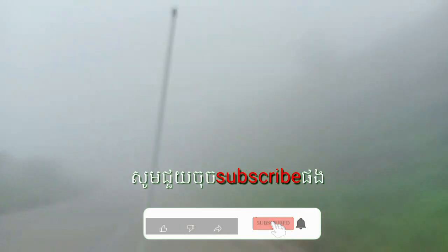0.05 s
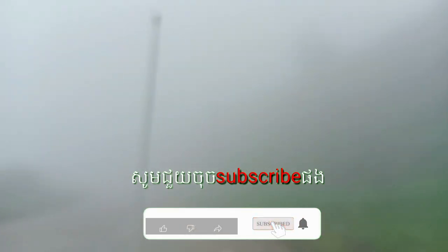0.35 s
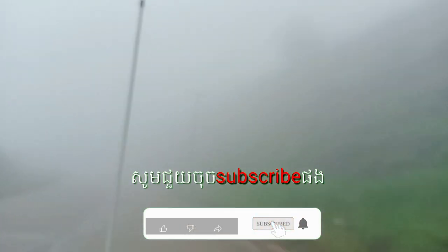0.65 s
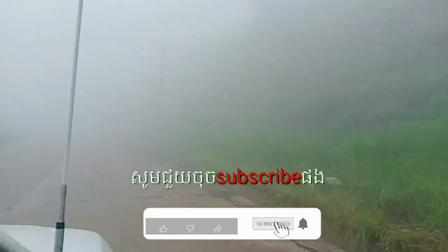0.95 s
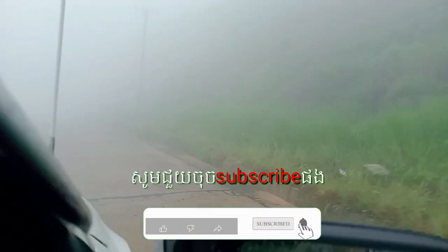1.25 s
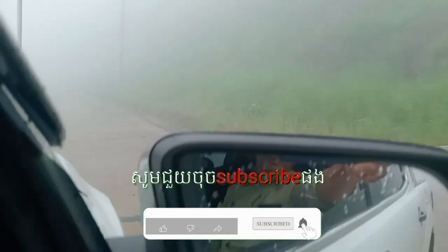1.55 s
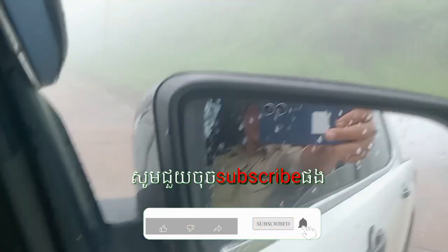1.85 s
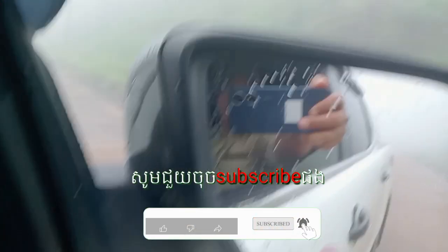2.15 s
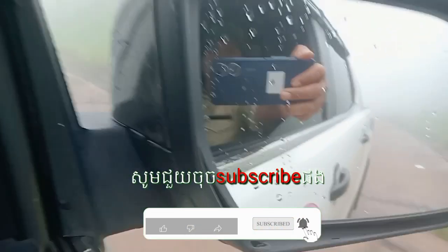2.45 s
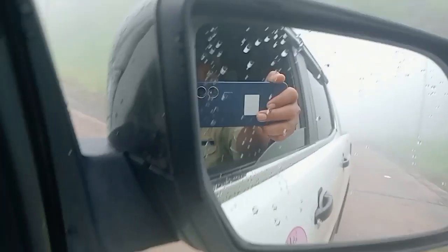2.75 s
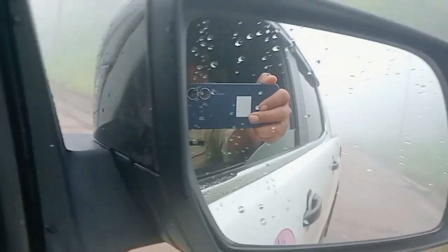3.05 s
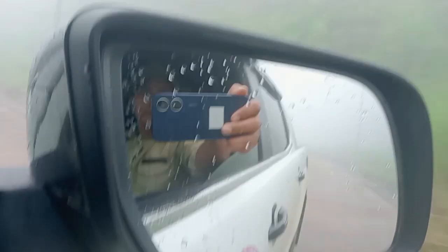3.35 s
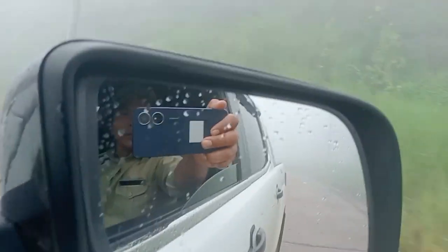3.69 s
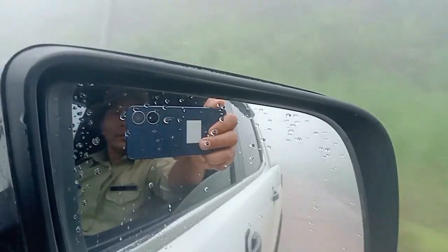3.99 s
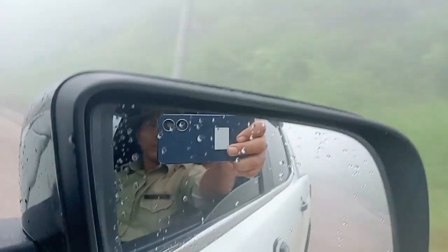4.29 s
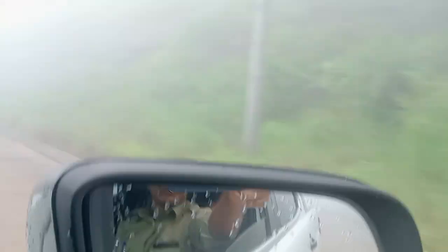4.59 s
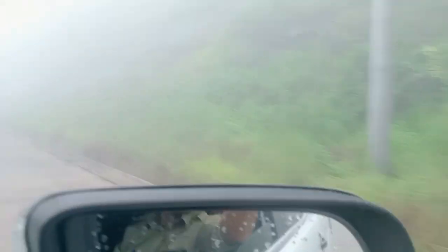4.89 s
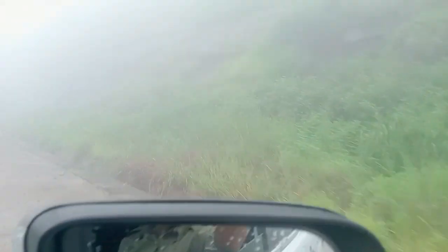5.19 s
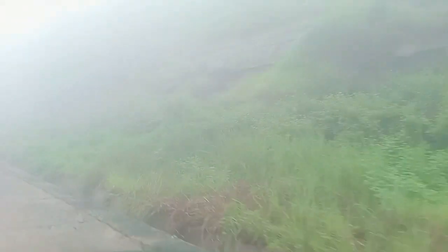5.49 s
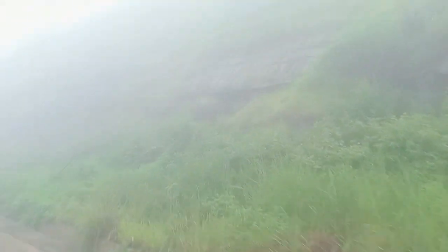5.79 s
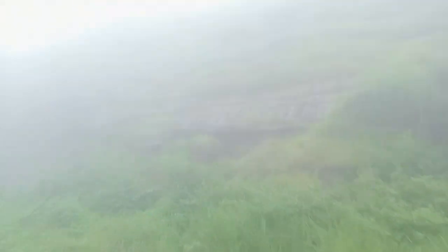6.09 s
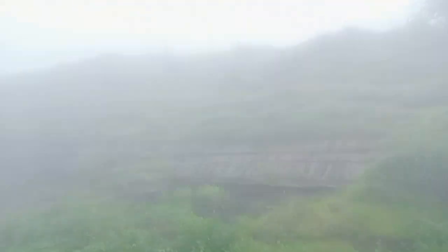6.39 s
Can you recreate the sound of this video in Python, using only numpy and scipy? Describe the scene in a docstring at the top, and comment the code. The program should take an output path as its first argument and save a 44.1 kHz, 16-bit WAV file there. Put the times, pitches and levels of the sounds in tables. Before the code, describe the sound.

Strong wind buffets a phone microphone at the open window of a moving car from start to finish, a low, uneven rumble with flutter on top. Sharp gusts thump at about 0.3 and 0.5 seconds, then come thickly between 0.8 and 1.6 seconds, with more from 2.2 to 2.5. Behind the wind, tyres roar and spray on the wet road and the slipstream makes a watery hiss. A faint, high whistle from a gap turns breathy after about 1.4 seconds. From 3.4 to 5.5 seconds the wind gives several short, rough, low hoots, strongest around 4 seconds, and its flutter grows brighter. A very faint sizzle of mist rises around 3.5 seconds, and a few tiny droplets tick on the phone at scattered moments. The buffeting eases somewhat after 6 seconds as the tyre roar comes up, lasting until about 6.5.

```python
"""Wind buffets the microphone of a phone held at the open window of a car on a wet road.
Eddies rumble and flutter at the port in surges and lulls, brighter as the flow speeds up;
now and then vortices shed in step and hoot. Behind the wind, tyres roar and spray, the
slipstream hisses, a gap whistles faintly, mist sizzles and a few droplets tick on the case."""
import sys
import numpy as np
from scipy import signal
from scipy.fft import rfft, irfft
from scipy.io import wavfile
from scipy.ndimage import uniform_filter1d, minimum_filter1d, map_coordinates

SR = 44100
rng = np.random.default_rng(int(sys.argv[2]) if len(sys.argv) > 2 else 0)


def unload_audio(sound):
    """Save the sound as a 16-bit wav file, at the path given as the first command line argument."""
    columns = np.transpose(np.atleast_2d(sound))
    # keep every value between -1 and 1, then stretch to whole-number steps
    steps = np.round(np.clip(columns, -1, 1) * 32767)
    wavfile.write(sys.argv[1], SR, steps.astype(np.int16))


N = 288414
TIME_S = np.arange(N) / SR

# Mean wind at the port. Each row: time in seconds, rumble and flutter in dB before trim.
WIND_LEVELS = [(0, -15.5, -33), (0.72, -20, -32.5), (0.8, -11, -27.5), (1.1, -15.5, -37),
               (1.3, -13.5, -26.5), (1.9, -17, -29.5), (2.2, -15, -25.5), (2.83, -18, -27.5),
               (3.05, -14, -22), (3.5, -14, -29), (3.75, -12, -26.5), (3.98, -14, -16), (4.4, -13.5, -22),
               (4.78, -22.5, -24.5), (5.2, -12.5, -20.5), (5.6, -14, -17), (6.1, -19.5, -25),
               (6.54, -22, -26.5)]
# Flow past the port. Each row: time in seconds, speed as a ratio.
FLOW_SPEED = [(0, 0.87), (.9, 0.86), (1.6, 0.77), (3.0, 1), (3.7, 1.147), (4.6, 1.09), (5.6, 1.4),
              (6.54, 1.103)]
# Single eddies. Each row: centre and length in seconds, rumble and flutter surge in dB.
EDDY_HITS = [(0.287, 0.0093, 15, 14.5), (0.447, 0.07, 5.5, 3), (0.519, 0.011, 12, 7),
             (0.863, 0.018, 6.5, 0), (0.916, 0.014, 5.5, -12), (0.973, 0.017, 6, 4),
             (1.007, 0.014, 12.5, 0), (1.211, 0.032, 7, 7.5), (1.285, 0.012, 8, 8), (1.398, 0.019, 3, -11),
             (1.457, 0.019, 5.5, 6.5), (1.51, 0.028, 6, 0), (1.621, 0.02, 8.5, 5), (2.165, .04, 7, 3.5),
             (2.32, 0.022, 4, 5), (2.46, 0.022, 4, 4.5), (2.546, 0.07, 4, 2.5), (2.985, 0.021, 1, 9),
             (3.039, 0.025, 4, -1.5), (3.074, 0.02, 4.5, 2), (3.159, 0.0088, 1, 10.5),
             (4.037, .05, -1, -0.5), (4.088, .02, 2.5, -2), (4.566, 0.021, 6.5, 4), (4.617, 0.04, 0, 5.5),
             (4.687, 0.039, 5, 3.5), (4.922, .04, 3.5, 6), (5.13, 0.044, 1.5, 4.5), (5.266, .025, 6.5, -2),
             (5.871, 0.02, 0.5, 4.5), (6.01, 0.051, 4.5, 4), (6.265, 0.038, 1.5, 8.5)]
# The flow leaves the port briefly. Each row: centre in seconds, dip in dB.
FLOW_LULLS = [(0.198, -5.5), (0.756, -4.5), (1.155, -5.5), (2.108, -1), (2.809, -0.5), (4.527, -2.5),
              (4.59, -3), (5.038, -3)]
# Noise spectra, wind at unit speed. Each row: frequency in Hz, relative density in dB.
WIND_SPECTRUM = [(10, -50), (25, -22), (40, -22.5), (55, -9.5), (75, -1.5), (125, 1.5), (200, -2),
                 (300, -5.5), (500, -12.5), (800, -21.5), (1300, -37), (2500, -58), (6000, -100)]
ROAR_SPECTRUM = [(25, 1.5), (100, 2), (500, -4.5), (1000, 0), (1450, -2), (1900, -2.5), (2600, -21),
                 (6000, -55)]
SPRAY_SPECTRUM = [(2000, -32), (3900, -5.5), (4450, 13), (4900, 4.5), (5500, 1), (6100, -12), (6800, -25),
                  (9000, -28), (15500, -35.5)]
HISS_SPECTRUM = [(1000, -24), (1700, -2.5), (2100, 2), (2750, 1), (2930, -1.5), (3280, -2.5), (3480, 3),
                 (3800, 1.5), (4100, -1.5), (4450, -1.5), (4900, -16), (6000, -37), (8000, -43.5)]
# Wet tyres. Each row: time in seconds, roar in dB, spray in dB re hiss, both before trim.
TYRE_LEVELS = [(0, -37.5, -19), (0.35, -30, -17), (0.8, -30.5, -15.5), (1.3, -35.5, -17.5),
               (1.85, -35.5, -16.5), (2.7, -33, -21.5), (2.95, -29, -20), (3.85, -29, -24),
               (4.12, -33, -20), (4.4, -38.5, -28.5), (5.1, -30.5, -28), (5.75, -31.5, -17.5),
               (6.05, -29.5, -27), (6.25, -24.5, -23), (6.54, -28.5, -23)]
# Slipstream as the phone turns in and out of shelter. Each row: time in seconds, dB before trim.
HISS_LEVELS = [(0, -34), (0.18, -35), (0.25, -28.5), (0.85, -26.5), (0.93, -31.5), (1.13, -32),
               (1.19, -27.5), (1.31, -33), (1.85, -33.5), (2.2, -30.5), (2.78, -31), (2.9, -26.5),
               (3.92, -29.5), (4.09, -36), (4.7, -34), (5.12, -26.5), (5.75, -31.5), (6.3, -27.5)]
# Hollows by the window. Each row: centre and width in Hz, sheltered and leaning level in dB re hiss.
HOLLOW_MODES = [(3056, 18, -13.5, -26), (3385, 88, -28.5, -9.5), (3558, 150, -9, -21.5),
                (3775, 320, -14, -8), (4450, 940, -24, -8.5)]
# Lean of the phone into the slipstream. Each row: time in seconds, share from 0 to 1.
PHONE_LEAN = [(0, 0), (2.8, 0.24), (4.7, 0.34), (5.1, 0.4), (5.6, 0.4), (6.2, 0.85), (6.54, 1)]
# Window gap. Each row: time in seconds, whistle in dB re hiss before trim, purity from 0 to 1.
GAP_WHISTLE = [(0, -1, .4), (.55, -.5, .7), (.9, -2.5, .5), (1.24, 1, .55), (1.4, -4, .1), (4.6, -4, .05),
               (5.1, -2, .25), (5.9, -5, .1), (6.54, -7.5, .05)]
# Mist reaching the case. Each row: centre and length in seconds, rise in dB.
MIST_WAFTS = [(3.55, .55, 10), (4.996, .25, 7)]
# Droplets on the case. Each row: time in seconds, level in dB before trim.
DROPLET_HITS = [(1.2266, -38), (3.036, -40), (5.2131, -43), (5.765, -39), (6.3076, -40)]
# Vortex shedding. Each row: centre and length in seconds, pitch in Hz, level in dB.
VORTEX_SPELLS = [(3.426, 0.093, 125, -12), (3.573, 0.081, 127.6, -17), (3.708, 0.11, 126.2, -10.5),
                 (3.786, 0.046, 135, -5), (4.034, 0.051, 312.5, -6.5), (4.068, 0.02, 186.9, -3),
                 (4.475, 0.056, 335.7, -14.5), (4.618, 0.059, 313, -16.5), (5.095, 0.19, 174, -14.5),
                 (5.442, 0.054, 169.7, -9.5)]


def from_db(db):
    """Decibels to gain."""
    return 10 ** (np.asarray(db) / 20)


def unit_rms(x):
    """Scale to unit power."""
    return x / np.sqrt(np.mean(x ** 2) + 1e-20)


def curves(rows):
    """Interpolate each column to one value per sample."""
    times_s, *columns = np.transpose(rows)
    return [np.interp(TIME_S, times_s, column) for column in columns]


def coloured(gain_at):
    """Looping noise weighted by gain_at(hz), unit power."""
    hz = np.arange(N // 2 + 1) * SR / N
    return unit_rms(irfft(rfft(rng.standard_normal(N)) * gain_at(hz), N))


def noise(spectrum):
    """Noise from a spectrum table, interpolated in log frequency."""
    points_hz, points_db = np.transpose(spectrum)
    return coloured(lambda hz: from_db(np.interp(np.log(hz + 1), np.log(points_hz), points_db)))


def resonance(centre_hz, width_hz):
    """Turbulence ringing in one resonance, unit power."""
    return coloured(lambda hz: 1 / (1 + (2 * (hz - centre_hz) / width_hz) ** 2))


def drift(rate_hz):
    """Smooth random curve, unit RMS, rolling off above rate_hz."""
    coarse_s = TIME_S[::20]
    hz = np.arange(len(coarse_s) // 2 + 1) * SR / N
    spectrum = rfft(rng.standard_normal(len(coarse_s))) / (1 + (hz / rate_hz) ** 2)
    return np.interp(TIME_S, coarse_s, unit_rms(irfft(spectrum, len(coarse_s))))


def split(x, hz):
    """Low band and remainder; they sum to x."""
    low = signal.sosfiltfilt(signal.butter(3, hz, fs=SR, output="sos"), x)
    return low, x - low


def steady(x, window_s):
    """Even out swells slower than the window; unit power."""
    size = max(int(window_s * SR), 2)
    return x / np.sqrt(uniform_filter1d(uniform_filter1d(x ** 2, size), size) + 1e-12)


def swell(centre_s, length_s):
    """Gaussian bump of height 1; length_s spans two sigma."""
    return np.exp(-2 * ((TIME_S - centre_s) / length_s) ** 2)


def swirl(x, edges_hz, depth_db, rate_hz):
    """Each band below the top edge swells and fades on its own."""
    out = 0
    for edge_hz in edges_hz:
        low, x = split(x, edge_hz)
        out = out + low * from_db(depth_db * drift(rate_hz))
    return out + x


def surges(lull_s=0.03):
    """Eddies and lulls shift the rumble and the flutter; both in dB."""
    rumble_db = flutter_db = sum(db * swell(centre_s, lull_s) for centre_s, db in FLOW_LULLS)
    for centre_s, length_s, rumble_peak_db, flutter_peak_db in EDDY_HITS:
        bump = swell(centre_s, length_s)
        rumble_db = rumble_db + rumble_peak_db * bump
        flutter_db = flutter_db + flutter_peak_db * bump
    return rumble_db, flutter_db


def wind(rumble_trim_db=-0.64, flutter_trim_db=1.0, unit_speed_thump_hz=121.8, churn_share=0.59):
    """Large eddies rumble and break into clumps of small ones that flutter; surges thump the port."""
    rumble_db, flutter_db = curves(WIND_LEVELS)
    speed, = curves(FLOW_SPEED)
    surge_db, flutter_surge_db = surges()
    # A frozen eddy field sweeps past the port.
    pressure = map_coordinates(noise(WIND_SPECTRUM), [np.cumsum(speed)], order=3, mode="grid-wrap")
    large, small = split(pressure, hz=297.4)
    clumps_db = 3.0 * drift(23)
    large = steady(large * from_db(clumps_db), window_s=0.07)
    small = swirl(small, np.geomspace(400, 1100, 5), depth_db=2.5, rate_hz=11)
    small = steady(small * from_db(clumps_db / 2), window_s=0.091)
    # Part of a surge lifts the rumble; the remaining power drives the thump.
    churn_db = np.minimum(surge_db, churn_share * surge_db)
    thump_power = np.maximum(from_db(2 * surge_db) - from_db(2 * churn_db), 0)
    thump_hz = unit_speed_thump_hz * speed * (1 + 0.2 * drift(40))
    thump = np.sqrt(2 * thump_power) * np.sin(2 * np.pi * np.cumsum(thump_hz) / SR)
    rumble = from_db(rumble_db + churn_db + rumble_trim_db) * large
    flutter = from_db(flutter_db + flutter_surge_db + flutter_trim_db) * small
    return rumble + from_db(rumble_db) * thump + flutter


def tyres(hiss_db, roar_trim_db=-1.45, spray_trim_db=5.5):
    """Wet tyres roar and throw fine spray, whose level follows the hiss."""
    roar_db, spray_db = curves(TYRE_LEVELS)
    roar = swirl(noise(ROAR_SPECTRUM), np.linspace(700, 1900, 6), depth_db=4.0, rate_hz=20)
    spray = from_db(hiss_db + spray_db + spray_trim_db) * noise(SPRAY_SPECTRUM)
    return from_db(roar_db + roar_trim_db) * roar + spray


def gap_whistle(trim_db=-0.36):
    """A gap locks onto one pitch while the flow is even; otherwise it is breathy."""
    level_db, purity = curves(GAP_WHISTLE)
    tone = steady(resonance(centre_hz=2310, width_hz=40), window_s=0.05)
    breath = resonance(centre_hz=2315, width_hz=185)
    return from_db(level_db + trim_db) * (np.sqrt(purity) * tone + np.sqrt(1 - purity) * breath)


def squeals(per_s=110, length_s=0.046, low_hz=2000, high_hz=4500, glide_share=0.011, trim_db=-8.5):
    """Tiny eddies sing brief gliding notes: a watery grain in the hiss."""
    out = np.zeros(N + SR)
    size = int(length_s * SR)
    ramp = 2 * np.arange(size) / (length_s * SR) - 1
    for when, pitch, glide, strength in rng.random((int(per_s * N / SR), 4)):
        centre_hz = low_hz + pitch * (high_hz - low_hz)
        hz = centre_hz * (1 + glide_share * (2 * glide - 1) * ramp)
        tone = np.sin(2 * np.pi * np.cumsum(hz) / SR)
        start = int(when * N)
        out[start:start + size] += 2 * strength * np.hanning(size) * tone
    return from_db(trim_db) * out[:N]


def slipstream(hiss_db, trim_db=-1.22, fitful_db=3.0):
    """Passing air hisses, rings fitfully in hollows, blows the gap and squeals."""
    lean, = curves(PHONE_LEAN)
    rush = noise(HISS_SPECTRUM)
    for centre_hz, width_hz, sheltered_db, leaning_db in HOLLOW_MODES:
        ring_db = sheltered_db + lean * (leaning_db - sheltered_db) + fitful_db * drift(25)
        rush += from_db(ring_db) * resonance(centre_hz, width_hz)
    rush = swirl(rush + gap_whistle(), np.linspace(1500, 4500, 7), depth_db=2.46, rate_hz=42)
    return from_db(hiss_db + trim_db) * (rush + squeals())


def mist(base_db=-77, grain_db=4.5, follow_share=0.9, usual_hiss_db=-30):
    """Fine drops in the slipstream sizzle unevenly, high and faint."""
    hiss_db, = curves(HISS_LEVELS)
    waft_db = sum(db * swell(centre_s, length_s) for centre_s, length_s, db in MIST_WAFTS)
    level_db = base_db + follow_share * (hiss_db - usual_hiss_db) + waft_db
    sizzle = resonance(centre_hz=11200, width_hz=3000) * from_db(grain_db * drift(300))
    return from_db(level_db) * unit_rms(sizzle)


def droplets(length_s=0.001, trim_db=-3):
    """Each droplet strikes the case with a tiny bright tick."""
    envelope = sum(from_db(db + trim_db) * swell(time_s, length_s) for time_s, db in DROPLET_HITS)
    _, treble = split(rng.standard_normal(N), hz=5000)
    return envelope * treble


def vortex_shedding(wander_share=0.0702, sag_share=0.12):
    """Vortices leave an edge in step: a rough hoot that sinks as the flow slackens."""
    out = np.zeros(N)
    wander = 1 + wander_share * drift(41.4)
    for centre_s, length_s, centre_hz, db in VORTEX_SPELLS:
        progress = np.clip((TIME_S - centre_s) / length_s, -0.5, 0.5)
        hz = centre_hz * (1 - sag_share * progress) * wander
        out += from_db(db) * swell(centre_s, length_s) * np.sin(2 * np.pi * np.cumsum(hz) / SR)
    return out


def scene(waver_db=0.39):
    """Sum all sources at one microphone."""
    near = wind() + vortex_shedding() + mist() + droplets()
    hiss_db = curves(HISS_LEVELS)[0] + waver_db * drift(7.9)
    return (near + tyres(hiss_db) + slipstream(hiss_db))[None]


def record(dry, ceiling=0.86, low_cut_hz=45, stopband_hz=16000, window_s=0.001):
    """The microphone loses deep bass; a limiter ducks the strongest gusts; the top is cut."""
    dry = signal.sosfilt(signal.butter(3, low_cut_hz, "high", fs=SR, output="sos"), dry)
    size = int(window_s * SR)
    gain = np.minimum(1, ceiling / (np.abs(dry) + 1e-9))
    held = minimum_filter1d(gain, 2 * size)
    smoothed = uniform_filter1d(uniform_filter1d(held, size), size)
    return signal.sosfilt(signal.cheby2(12, 60, stopband_hz, fs=SR, output="sos"), dry * smoothed)


dry = scene()
out = record(dry)
unload_audio(out)
```